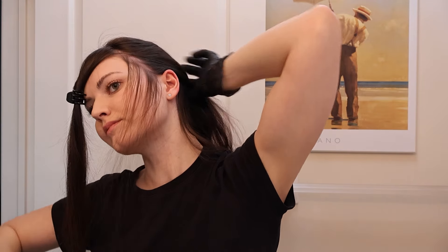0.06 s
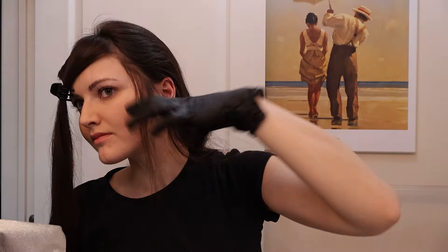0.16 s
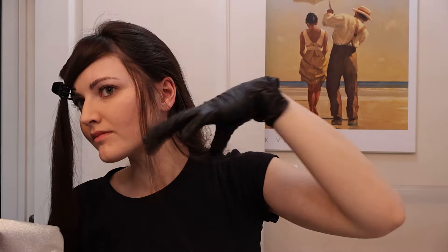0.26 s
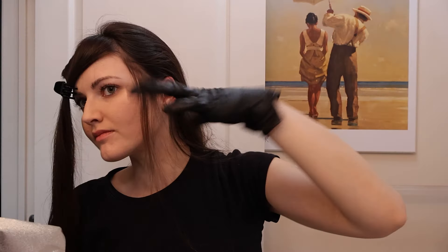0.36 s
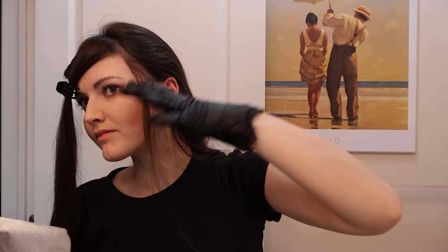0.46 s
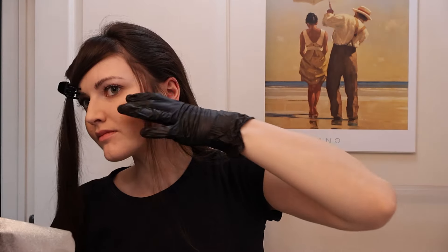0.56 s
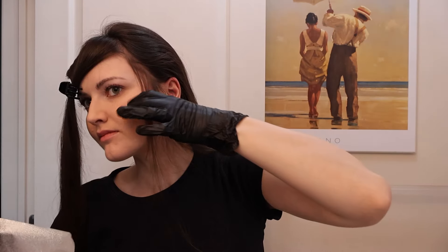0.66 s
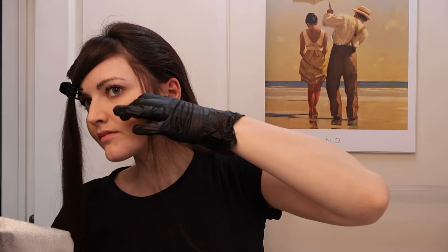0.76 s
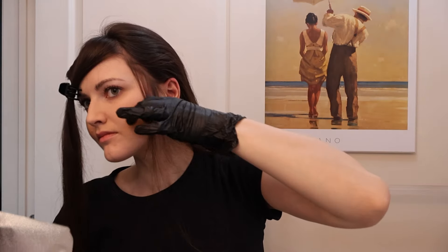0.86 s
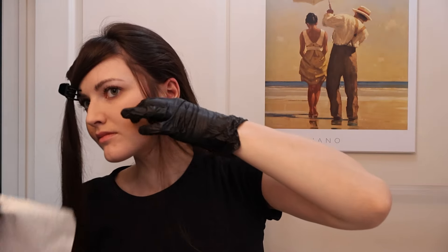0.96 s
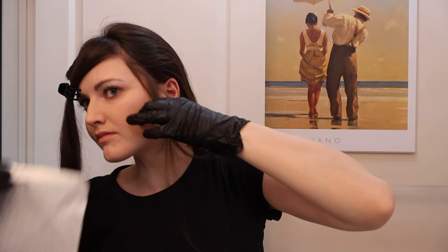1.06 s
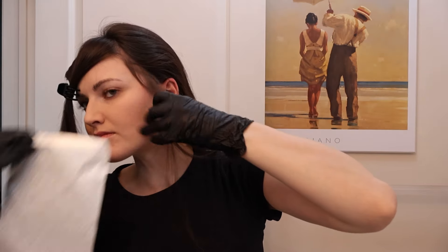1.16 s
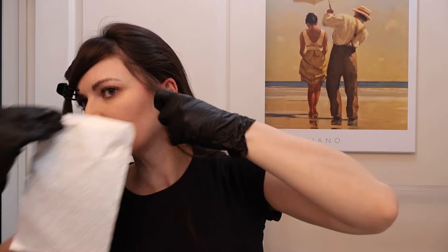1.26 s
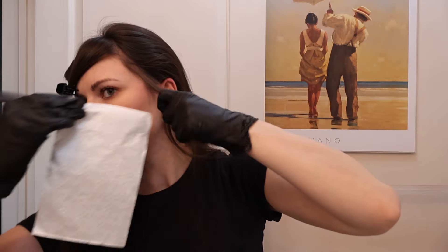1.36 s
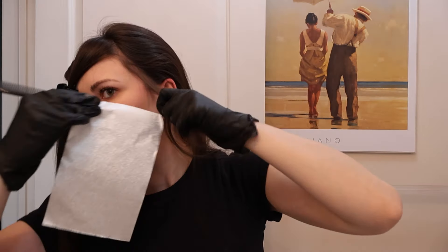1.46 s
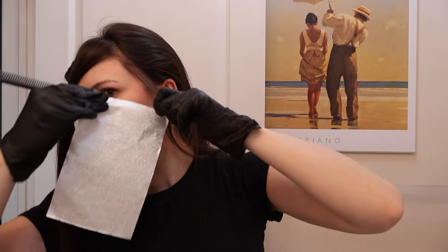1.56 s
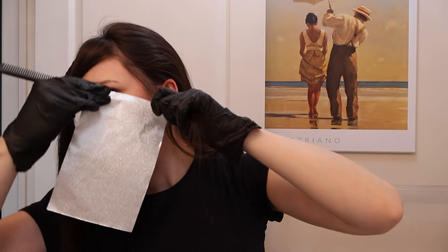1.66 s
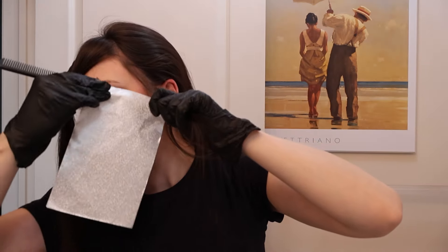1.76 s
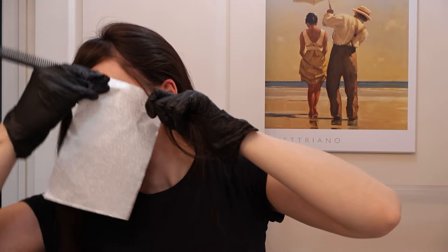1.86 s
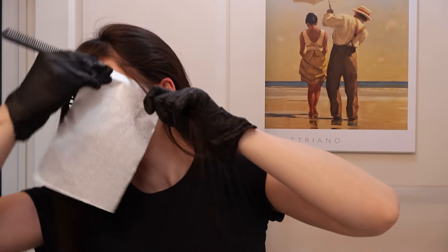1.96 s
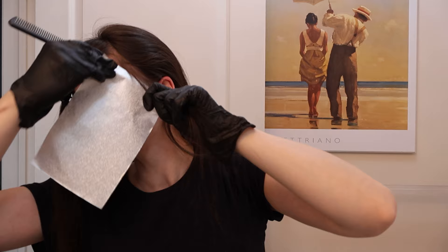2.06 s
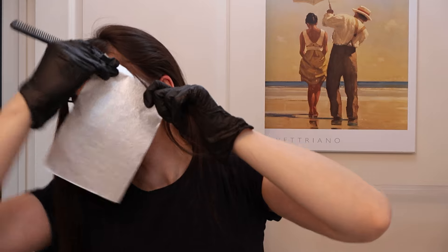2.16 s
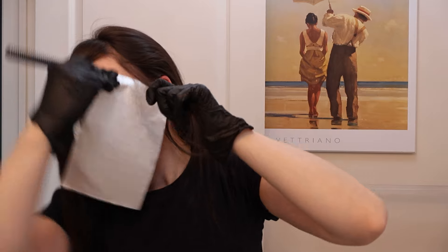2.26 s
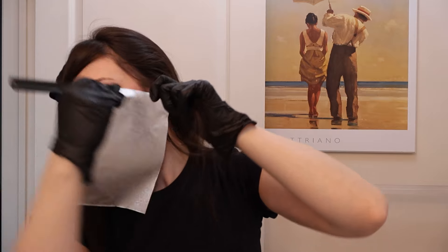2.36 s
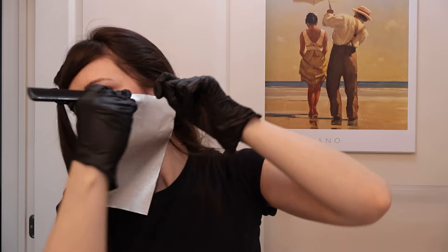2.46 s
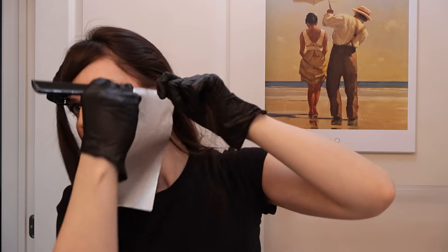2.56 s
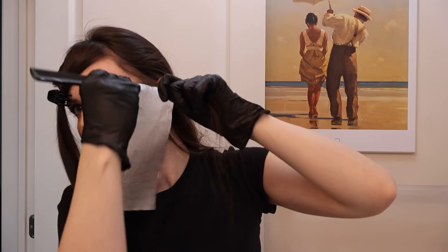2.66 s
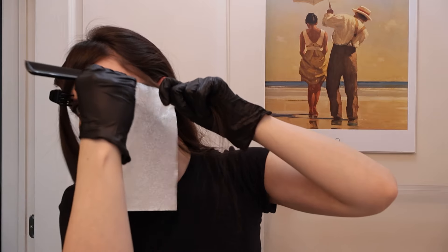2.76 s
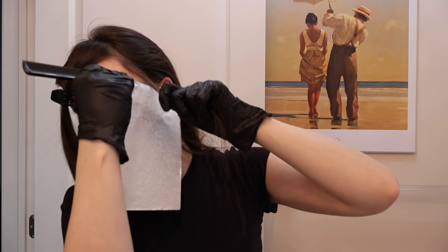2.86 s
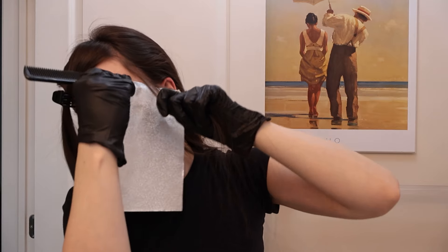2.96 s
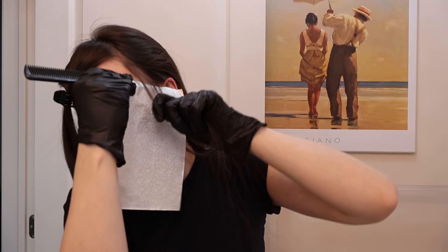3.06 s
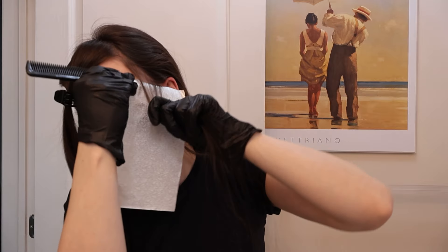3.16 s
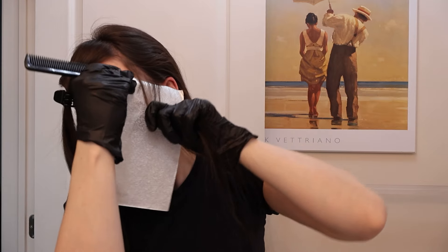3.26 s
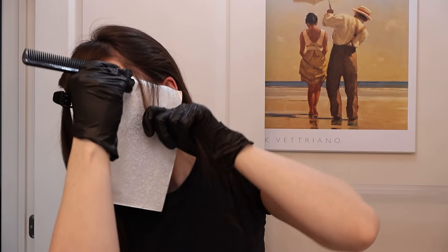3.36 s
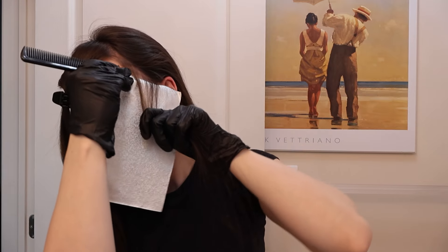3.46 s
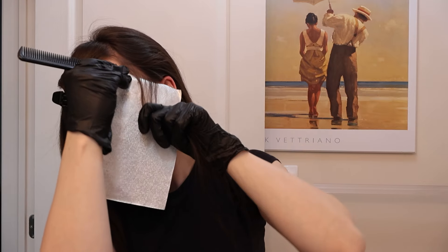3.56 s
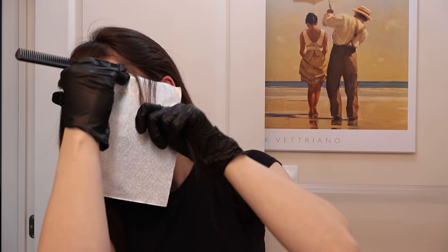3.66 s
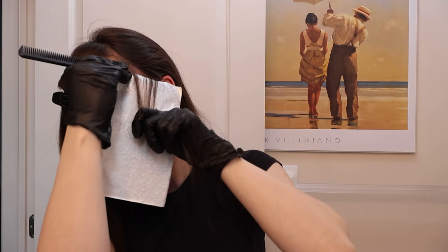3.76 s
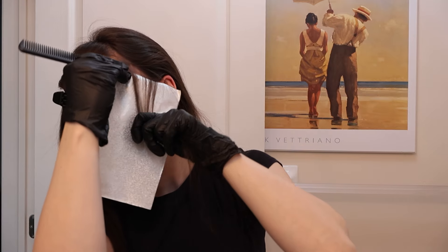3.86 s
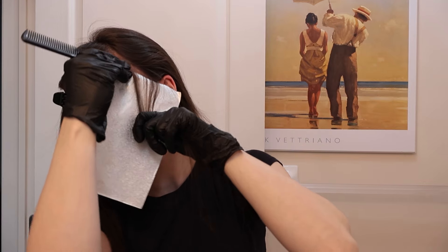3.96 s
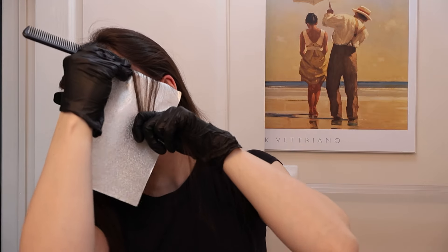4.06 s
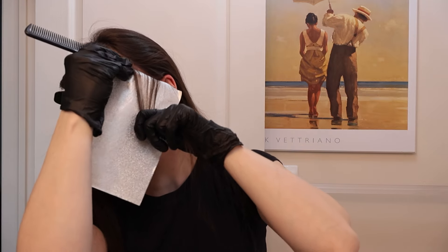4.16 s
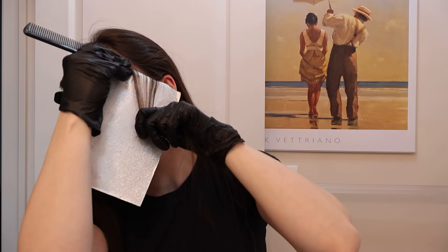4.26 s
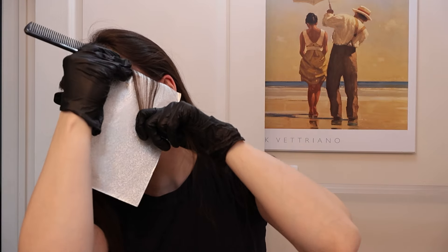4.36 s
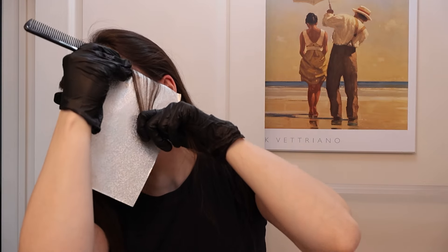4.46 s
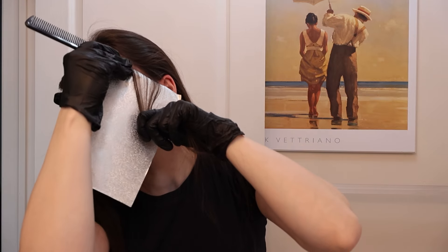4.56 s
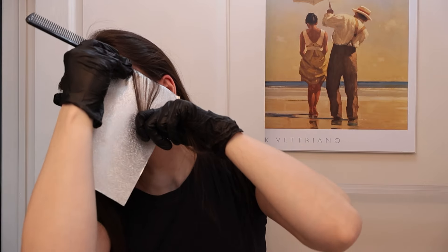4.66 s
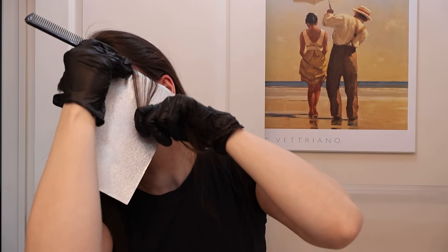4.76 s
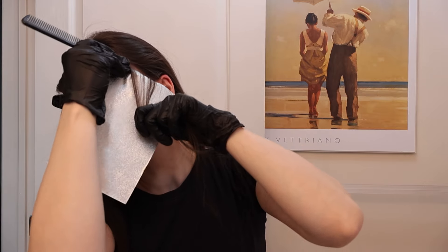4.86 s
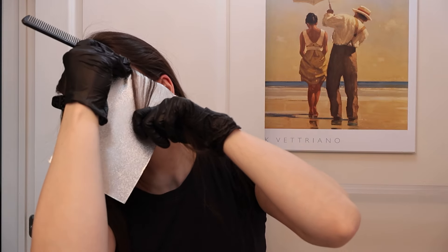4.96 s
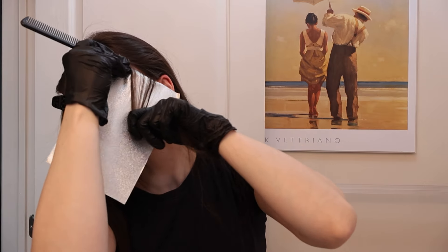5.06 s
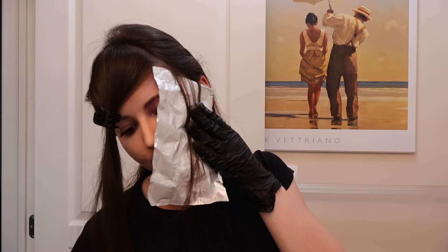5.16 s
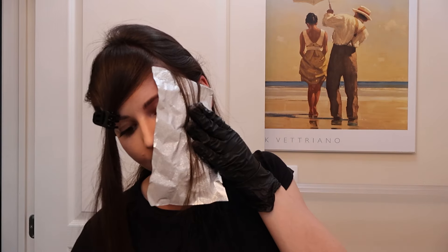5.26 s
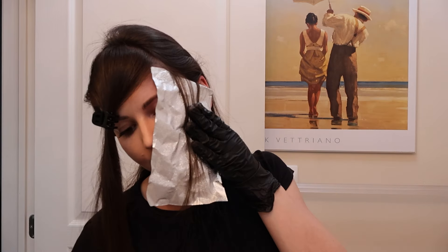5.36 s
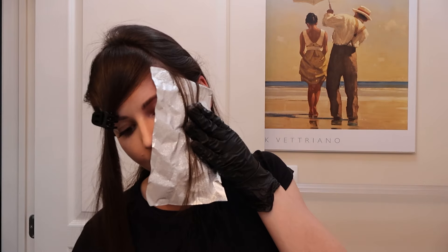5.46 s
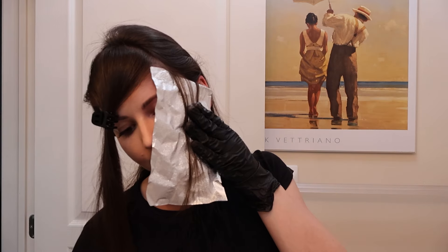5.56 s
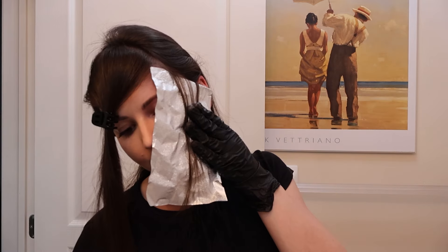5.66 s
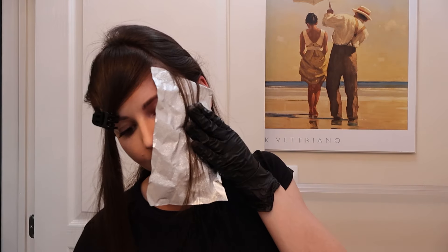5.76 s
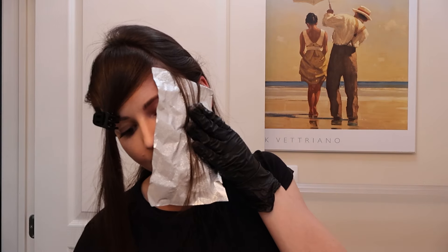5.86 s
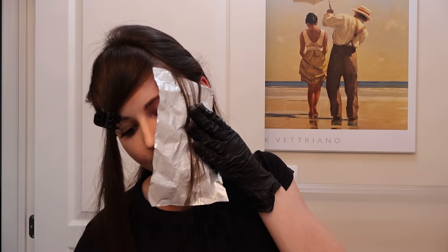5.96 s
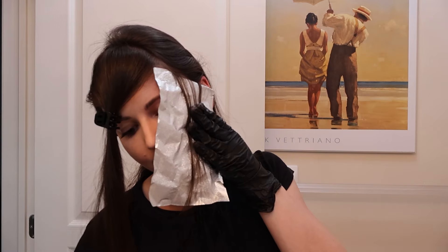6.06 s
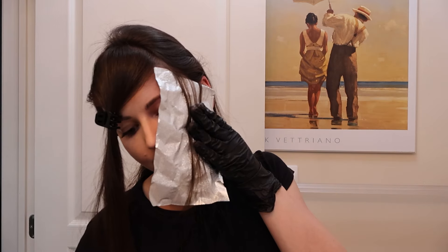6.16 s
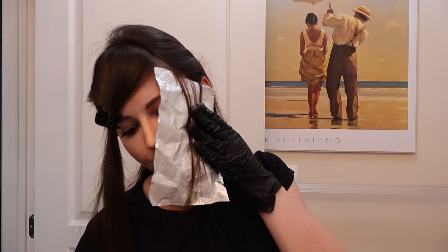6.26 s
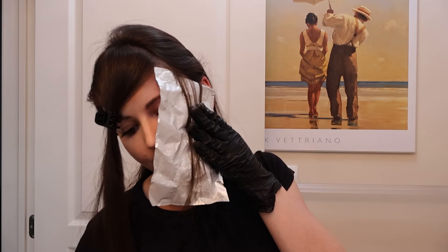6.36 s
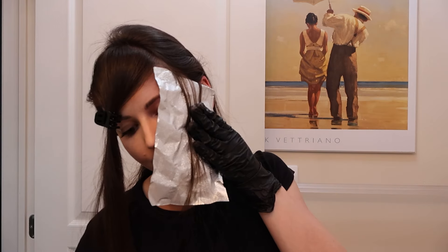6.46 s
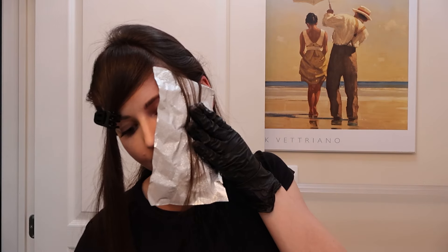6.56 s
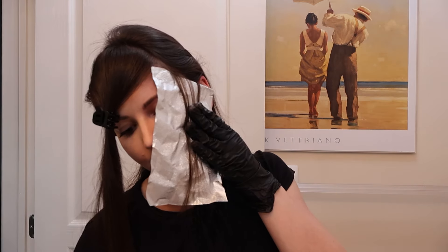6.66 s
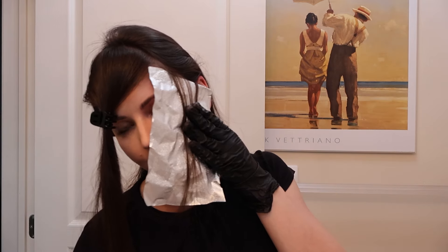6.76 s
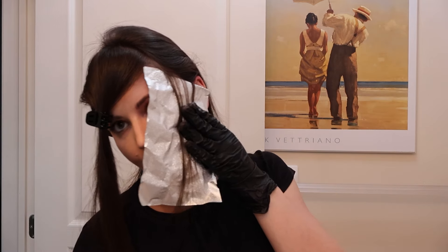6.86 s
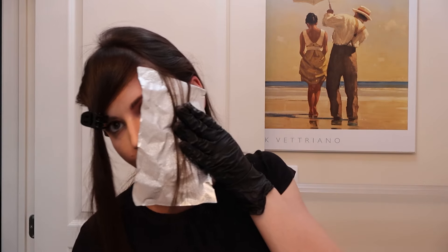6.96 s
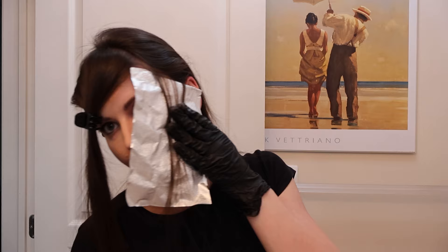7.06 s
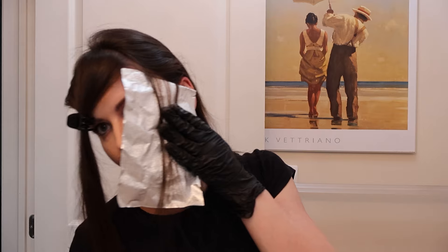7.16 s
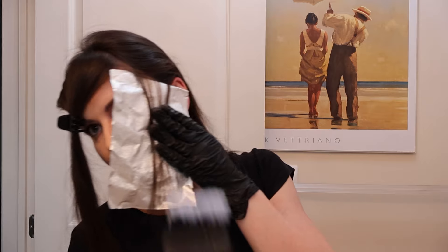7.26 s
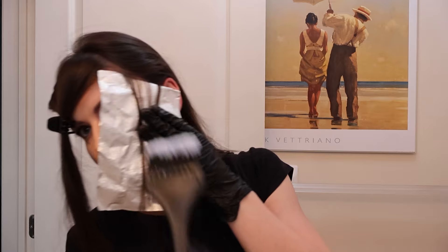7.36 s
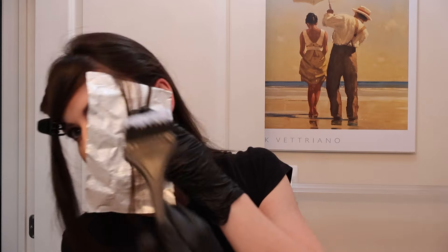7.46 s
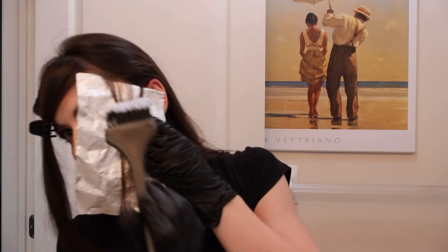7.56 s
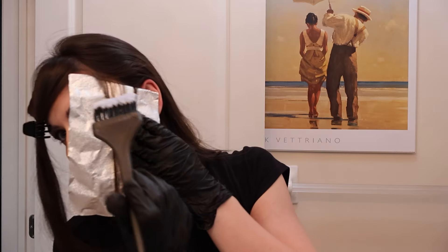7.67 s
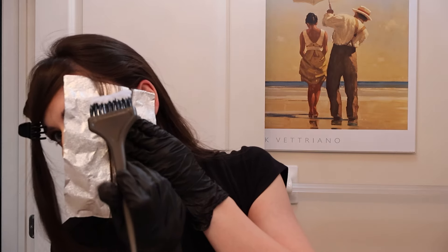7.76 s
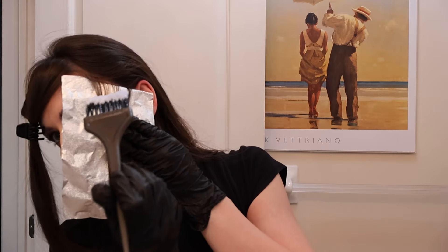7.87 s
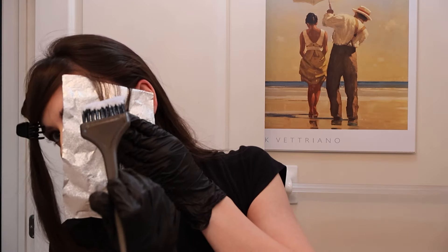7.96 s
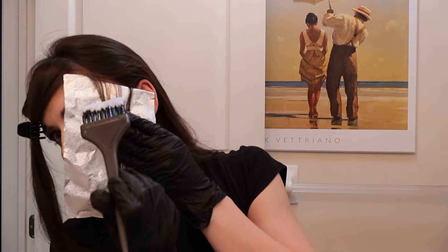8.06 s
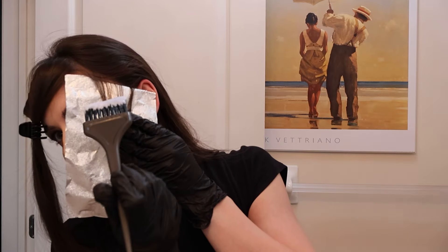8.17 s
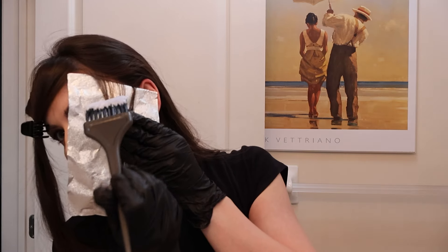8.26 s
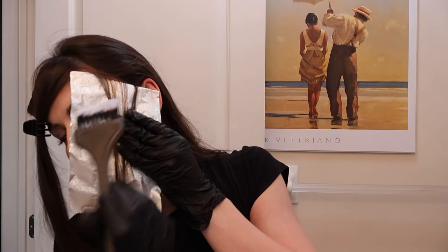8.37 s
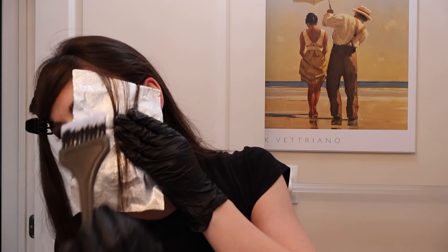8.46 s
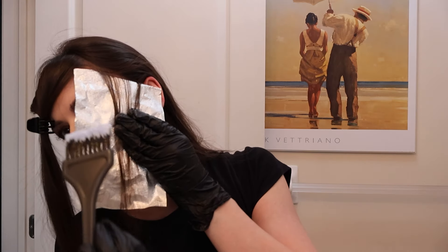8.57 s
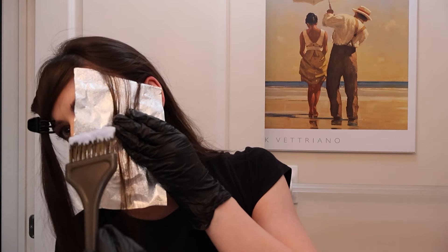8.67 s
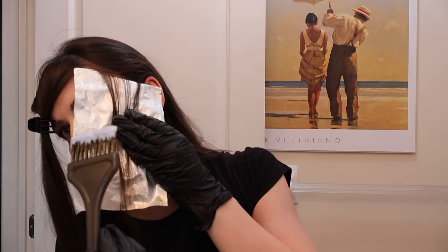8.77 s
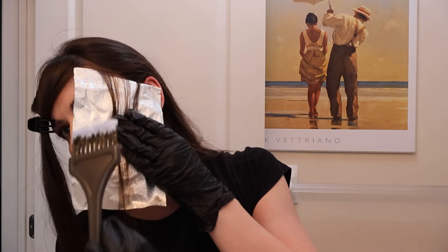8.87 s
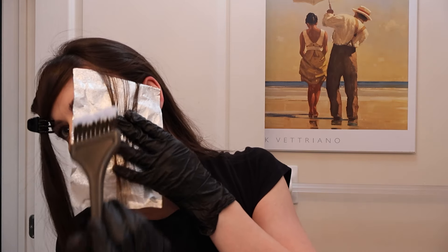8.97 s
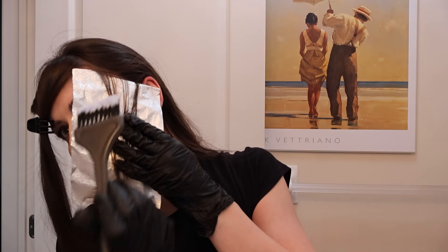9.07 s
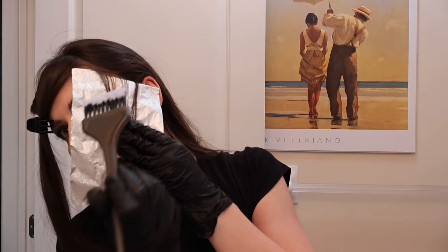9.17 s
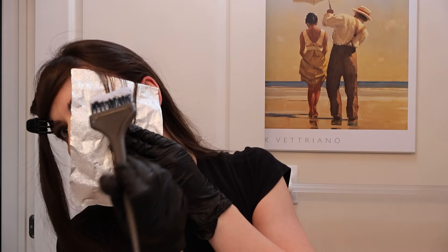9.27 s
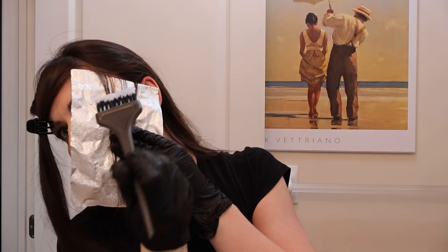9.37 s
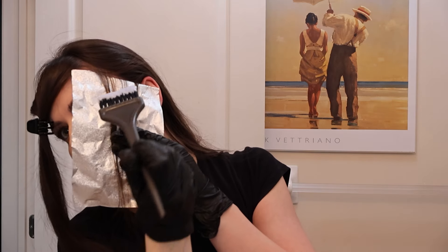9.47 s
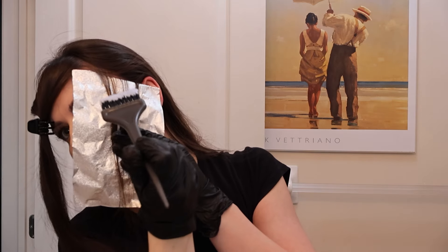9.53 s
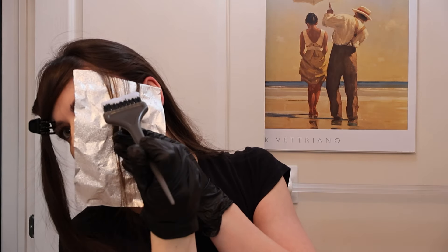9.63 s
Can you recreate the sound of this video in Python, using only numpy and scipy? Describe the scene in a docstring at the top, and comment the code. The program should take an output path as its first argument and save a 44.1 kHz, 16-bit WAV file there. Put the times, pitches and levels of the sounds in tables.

```python
"""Foil and tint brush in a small bathroom

Gloved hands slide a sheet of aluminium foil under a strand of hair, then dab it with a tint brush. Sliding and
bending are swarms of tiny random clicks; buckling pops and bristle ticks are dying bursts. Filters give each
contact its colour, and the hard walls answer with noise echoes and lingering modes. A nearly mono microphone
adds a presence peak over faint hiss and a low hum."""
import sys
import numpy as np
from scipy import signal
from scipy.fft import rfft, irfft
from scipy.io import wavfile

SR = 44100
rng = np.random.default_rng(int(sys.argv[2]) if len(sys.argv) > 2 else 0)


def dump_mix(stems):
    """Bounce the given channels to the path in sys.argv[1] as a 16-bit WAV at rate SR."""
    frames = np.atleast_2d(stems).T  # one column per channel
    limited = np.clip(frames, -1, 1)  # hard clip at full scale
    pcm = np.round(limited * 32767).astype(np.int16)
    wavfile.write(sys.argv[1], SR, pcm)


N = 427769


def undb(db):
    """Decibels to amplitude gain."""
    return 10 ** (np.asarray(db) / 20)


def db_at(points, hz):
    """Read a spectrum of (hz, db) points, joined by straight lines over log frequency."""
    point_hz, point_db = np.transpose(points)
    return np.interp(np.log(hz + 1), np.log(point_hz), point_db)


def colour(x, points, body_db=0, treble_db=0, ring_hz=1000, ring_db=0, size=1024):
    """Causal filter with the given spectrum; body (the sheet flexing), treble and one ring reshape it."""
    hz = np.arange(size // 2 + 1) * SR / size
    tilt = [(250, 0), (700, body_db), (1300, body_db), (2200, 0), (3500, 0), (8000, treble_db)]
    ring = ring_db / (1 + ((hz / ring_hz - 1) / .1) ** 2)
    gain = undb(db_at(points, hz) + db_at(tilt, hz) + ring)
    # folding the cepstrum gives minimum phase, so clicks keep a sharp onset
    cepstrum = irfft(np.log(gain))
    cepstrum[1:size // 2] *= 2
    cepstrum[size // 2 + 1:] = 0
    response = irfft(np.exp(rfft(cepstrum)))
    return signal.fftconvolve(x, response)


def add(track, s, sound):
    """Mix a sound into the track from time s on, trimmed to the track."""
    start = int(round(s * SR))
    sound = sound[max(-start, 0):max(N - start, 0)]
    start = max(start, 0)
    track[start:start + len(sound)] += sound


def background():
    """Steady coloured noise, mostly alike left and right, with a faint sine for a low hum."""
    # room air and microphone hiss: hz, level_db
    hiss_colour = [(20, -49.5), (60, -49), (100, -46.5), (180, -47.5), (300, -47), (600, -50.5),
                   (1200, -53.5), (2000, -55.5), (3000, -56.5), (8000, -58.5), (15500, -61.5)]
    # share of the hiss that differs between left and right: hz, level_db
    hiss_side = [(60, -7), (110, -8.5), (300, -14.5), (1300, -17), (4400, -15.5), (15000, -11)]
    hum_hz, hum_rms_db = 58.4, -76

    mid = colour(rng.standard_normal(N), hiss_colour)[:N]
    side = colour(rng.standard_normal(N), hiss_colour)[:N]
    side = colour(side, hiss_side)[:N]
    hum = undb(hum_rms_db) * np.sqrt(2) * np.sin(2 * np.pi * hum_hz * np.arange(N) / SR)
    return mid + hum + side * np.array([[1], [-1]])


def echoes(t, t60_s):
    """Envelope, of unit energy, of dense reflections that build up and die away."""
    build_up_s = 0.0017
    envelope = undb(-60 * t / t60_s) * (1 - np.exp(-t / build_up_s))
    return envelope / np.linalg.norm(envelope)


def bathroom(x, size=2048):
    """Direct sound, near surfaces, far walls and modes; the echo pattern shifts as the hands move."""
    # narrow resonances that linger in the room: hz, level_db, t60_s
    room_modes = [(696, -56, .4), (1367, -60, 0.41), (2159, -64, 0.28), (2430, -62, 0.27),
                  (2940, -55, 0.33), (4800, -57, .25), (8835, -63, 0.18)]
    near_t60_s, near_wet_db = 0.1, -1.5  # echo levels are relative to the direct sound
    far_t60_s, far_wet_db = 0.38, -5

    t = np.arange(SR // 3) / SR
    modes = sum(undb(db - 60 * t / t60_s) * np.cos(2 * np.pi * hz * t) for hz, db, t60_s in room_modes)
    near = undb(near_wet_db) * echoes(t, near_t60_s)
    far = undb(far_wet_db) * echoes(t, far_t60_s)
    tail = np.hypot(near, far)

    out = np.zeros(N)
    for start in range(0, len(x), size):
        # every block of sound meets a fresh pattern of reflections
        response = modes + tail * rng.standard_normal(len(t))
        response[0] += 1  # direct sound
        response /= np.linalg.norm(response)
        add(out, start / SR, signal.fftconvolve(x[start:start + size], response))
    return out[:len(x)]


def creases(envelope, per_s, spread_db):
    """Random tiny clicks of uneven size that together carry the energy of the envelope."""
    draws = np.random.default_rng(rng.integers(2 ** 31)).standard_normal((len(envelope), 3))
    chance, size, push = draws.T
    # each sample has the same small chance of a crease giving way
    fires = np.exp(-(chance ** 2 + push ** 2) / 2) < per_s / SR
    uneven = undb(spread_db * np.clip(size, -2, 2))
    clicks = fires * np.sign(push) * uneven * envelope
    return clicks * np.sqrt(np.sum(envelope ** 2) / (np.sum(clicks ** 2) + 1e-18))


def rubs(table, spectrum, per_s, spread_db):
    """Each short movement swells and fades as a swarm of creases."""
    out = np.zeros(N)
    for s, half_s, db, body_db, treble_db in table:
        t = np.arange(-5 * half_s, 5 * half_s, 1 / SR)
        swarm = creases(1 / np.cosh(t / half_s), per_s, spread_db)
        add(out, s + t[0], undb(db) * colour(swarm, spectrum, body_db, treble_db))
    return out


def swishes(table, body_db, treble_db):
    """Colour each movement by its pace: a quick swish is bright, a slow one dull."""
    middle_half_s, middle_treble_db, loss_db_per_doubling = 0.014, 3.5, 2
    coloured = []
    for s, half_s, db in table:
        pace_db = middle_treble_db - loss_db_per_doubling * np.log2(half_s / middle_half_s)
        coloured.append((s, half_s, db, body_db, treble_db + pace_db))
    return coloured


def facets(table, middle_hz, body_db_per_oct, treble_db_per_oct):
    """Colour each snap by its facet: a small one rings higher, with more treble and less body."""
    coloured = []
    for s, decay_ms, db, hz in table:
        octaves = np.log2(hz / middle_hz)
        coloured.append((s, decay_ms, db, -body_db_per_oct * octaves, treble_db_per_oct * octaves, hz))
    return coloured


def snaps(table, spectrum, per_s, spread_db, first_share, ring_db):
    """One fold gives way at once and sets off a dying avalanche of smaller ones; the facet rings."""
    out = np.zeros(N)
    share = np.clip(first_share, 0, 1)  # of the energy, in the first click
    for s, decay_ms, db, body_db, treble_db, ring_hz in table:
        envelope = np.exp(-np.arange(SR // 12) / SR * 1000 / decay_ms)
        burst = np.sqrt(1 - share) * creases(envelope, per_s, spread_db)
        burst[0] += np.sqrt(share * np.sum(envelope ** 2))
        add(out, s, undb(db) * colour(burst, spectrum, body_db, treble_db, ring_hz, ring_db))
    return out


def sleeve():
    """Shirt cloth shifting as an arm moves: soft, low swarms of clicks."""
    # movements of the cloth: centre_s, half_length_s, level_db, body_db, treble_db
    sleeve_moves = [(0.46, .008, -37, 7.5, 4), (2.2, 0.18, -42.5, 12.5, 0), (4.85, 0.27, -40, 0.5, 2),
                    (7.55, .18, -38.5, 0.5, -2)]
    # what cloth radiates: hz, level_db
    sleeve_colour = [(100, -26), (220, -9.5), (300, -3), (420, -2.5), (600, -14.5), (1500, -14.5),
                     (8000, -34.5)]
    return rubs(sleeve_moves, sleeve_colour, per_s=5900, spread_db=4.5)


def hair():
    """A glove smoothing the strand gives only a thin, high hiss of fine clicks."""
    # strokes of the glove: centre_s, half_length_s, level_db
    hair_swishes = [(0.15, 0.33, -57.5), (0.741, 0.021, -52.5), (0.928, 0.016, -47.5), (0.975, 0.037, -54),
                    (1.089, .016, -52.5)]
    # what a glove on hair radiates: hz, level_db
    hair_colour = [(100, -20), (1000, -5), (3200, -2), (5300, 6.5), (9000, 3), (15800, -4.5)]
    moves = swishes(hair_swishes, body_db=-1, treble_db=1)
    return rubs(moves, hair_colour, per_s=5000, spread_db=7.0)


def flicks(strokes, count=2):
    """Single bristles flick free: high ticks at random moments around each stroke's centre."""
    above_stroke_db, ring_hz = 3, 12800
    moments = rng.standard_normal((len(strokes), count))
    ticks = []
    for (s, half_s, db), row in zip(strokes, moments):
        for when in row:
            ticks.append((s + half_s * when, db + above_stroke_db, ring_hz))
    return ticks


def brush():
    """Bristles catch less often than sliding foil, so they sound grainy; pressing sounds hollow."""
    # bristles dragging over the foil: centre_s, half_length_s, level_db (before the mix gain)
    brush_strokes = [(7.18, 0.041, -49), (7.5, .12, -53.5), (8.0, 0.17, -55), (8.344, 0.02, -41.5),
                     (8.45, 0.027, -45.5), (8.508, .018, -38), (8.544, 0.0043, -30.5),
                     (8.572, 0.032, -41.5), (8.675, 0.02, -40), (8.901, 0.021, -42), (8.96, .04, -47.5),
                     (9.03, 0.0087, -42), (9.148, 0.038, -42.5), (9.255, 0.026, -49), (9.297, 0.011, -38.5),
                     (9.355, 0.032, -46)]
    # the brush pressing the sheet against the palm: centre_s, half_length_s, level_db (before the mix gain)
    brush_presses = [(8.481, .055, -44.5), (8.68, 0.028, -51), (8.825, .018, -50), (9.162, 0.041, -52)]
    # sticky bristles landing or letting go: start_s, level_db (before the mix gain), facet_ring_hz
    brush_ticks = [(7.184, -36.5, 12400), (7.3158, -36.5, 11400), (7.5985, -36.5, 3280), (7.646, -37, 2400),
                   (7.8658, -30, 5100), (7.8856, -22, 3930), (7.9245, -24.5, 2230), (7.978, -29.5, 2350),
                   (8.204, -32.5, 2460), (8.483, -28, 900), (8.5232, -18, 7460), (8.6593, -30, 12500),
                   (8.81, -43, 680), (9.05, -28, 12900), (9.1165, -26.5, 1840), (9.1743, -20.5, 1610),
                   (9.235, -24, 2570), (9.245, -21, 4870), (9.3226, -26, 11900), (9.4529, -25, 740),
                   (9.561, -24, 2040), (9.5723, -19, 1710), (9.5944, -24.5, 5200)]
    # what strokes and presses radiate: hz, level_db
    stroke_colour = [(100, -11), (300, -4), (500, -0.5), (700, 7.5), (900, 7), (1200, -0.5), (2000, 1),
                     (2400, 1), (5000, -1), (13000, -11), (15800, -12)]
    # what ticks radiate: hz, level_db
    tick_colour = [(100, -25), (300, -13), (650, -1.5), (1200, -2), (2000, -1), (4500, 1), (8900, -4),
                   (13300, -6.5), (15800, -5)]
    press_body_db, press_treble_db, tick_decay_ms = 7, -9, 1.63

    moves = swishes(brush_strokes, body_db=-3.0, treble_db=5)
    strokes = rubs(moves, stroke_colour, per_s=2000, spread_db=2.5)

    moves = [(s, half_s, db, press_body_db, press_treble_db) for s, half_s, db in brush_presses]
    presses = rubs(moves, stroke_colour, per_s=2000, spread_db=4.0)

    touches = [(s, tick_decay_ms, db, hz) for s, db, hz in brush_ticks + flicks(brush_strokes)]
    touches = facets(touches, middle_hz=5000, body_db_per_oct=1.7, treble_db_per_oct=7.0)
    # many bristles touch together, so a tick is a tight, even cluster
    ticks = snaps(touches, tick_colour, per_s=15000, spread_db=3.0, first_share=.2, ring_db=5.0)
    return undb(-1.6) * (strokes + presses) + undb(0.06) * ticks


def drags(table, spectrum, per_s, spread_db):
    """The sheet catches and slips: a long swarm of creases as loud as its fluttering friction."""
    flutter_per_s, flutter_db = 110, 3
    out = np.zeros(N)
    for curve, body_db, treble_db in table:
        s, db = np.transpose(curve)
        t = np.arange(s[0], s[-1], 1 / SR)
        grip = rng.standard_normal(size=512)
        flutter = np.interp((t - s[0]) * flutter_per_s, np.arange(len(grip)), grip)
        envelope = undb(np.interp(t, s, db) + flutter_db * flutter)
        swarm = creases(envelope, per_s, spread_db)
        add(out, s[0], colour(swarm, spectrum, body_db, treble_db))
    return out


def bends(table):
    """A gentle bend is mostly body; in a hard one more creases join in and cover it."""
    middle_db, middle_body_db, body_loss_per_db, treble_db = -35, 6, 0.71, -31
    coloured = []
    for s, half_s, db in table:
        body_db = middle_body_db - body_loss_per_db * (db - middle_db)
        coloured.append((s, half_s, db, body_db, treble_db))
    return coloured


def foil():
    """The sheet hisses as it slides, rustles low as it bends and pops as it buckles."""
    # friction while the sheet is worked under the strand: time_s, level_db (before the mix gain)
    first_pull = [(1.92, -48), (1.975, -34), (2.01, -38.5), (2.11, -36.5), (2.18, -42), (2.22, -44),
                  (2.28, -47), (2.36, -43), (2.39, -45)]
    second_pull = [(2.39, -56), (2.5, -43), (2.6, -50), (2.67, -37.5), (2.82, -42.5), (2.93, -64),
                   (3.07, -39.5), (3.17, -47.5), (3.3, -52.1)]
    settling = [(3.3, -52.1), (3.38, -51), (3.62, -55.5), (3.72, -47.5), (3.79, -44), (3.87, -54),
                (4.06, -48), (4.15, -46.5), (4.2, -60)]
    smoothing = [(4.2, -67), (4.3, -56), (4.42, -56), (4.56, -49.5), (4.66, -55.5), (4.8, -51.5),
                 (4.93, -49.5), (5.15, -55.5)]
    # long movements: friction curve, body_db, treble_db
    long_drags = [(first_pull, -5, -1), (second_pull, -1, -2), (settling, 1, -1.3), (smoothing, 2.4, 0)]
    # short swishes on hair and gloves: centre_s, half_length_s, level_db (before the mix gain)
    foil_swishes = [(1.292, .026, -42.5), (1.438, 0.073, -48), (1.563, 0.0047, -30), (1.583, 0.0038, -32),
                    (1.854, 0.008, -36.5), (1.975, .014, -38.5), (2.178, .012, -45), (2.773, 0.018, -30.5),
                    (2.866, .016, -31.5), (2.977, 0.015, -34.5), (3.215, 0.014, -39),
                    (3.357, 0.0062, -44.5), (3.745, 0.017, -48), (4.262, 0.022, -44.5)]
    # the whole sheet bending: centre_s, half_length_s, level_db (before the mix gain)
    foil_bends = [(1.632, .024, -35), (2.37, .014, -39.5), (2.449, .022, -25.5), (2.497, .021, -27),
                  (2.69, 0.035, -55), (2.835, 0.032, -28.5), (2.921, 0.023, -23.5), (3.526, 0.013, -40.5),
                  (3.888, .015, -41), (4.325, .016, -48), (4.4, .025, -53), (4.62, .011, -54),
                  (4.688, .016, -42), (4.864, .025, -64), (5.123, 0.018, -43.5)]
    # the sheet buckling: start_s, decay_ms, level_db (before the mix gain), facet_ring_hz
    foil_pops = [(1.1985, 3.9, -48, 6850), (1.4165, 2.1, -39, 6030), (1.5525, 30, -31, 3280),
                 (1.5795, 7.2, -16, 1410), (1.584, 8, -26, 700), (1.591, 3.2, -16.5, 1810),
                 (1.8555, 2.0, -18.5, 2510), (2.0335, 3.6, -20.5, 2310), (2.293, 8.8, -31, 5400),
                 (2.4025, 12, -18.5, 2700), (2.46, 16.6, -20, 3100), (2.5145, 19, -25, 2400),
                 (2.572, 3.1, -17, 2090), (2.657, 5.2, -18, 2300), (3.108, 1.6, -28, 6100),
                 (3.4245, 15.3, -25, 2370), (3.987, 11, -24, 3970), (4.003, 1.8, -19, 5330),
                 (4.248, 20, -36.5, 3240), (4.4835, 4.2, -22, 3300), (4.5225, 6.3, -32.5, 3620),
                 (4.6745, 11, -34, 1070), (4.775, 0.59, -39, 9900), (5.0385, 13, -27, 3060),
                 (5.107, 2.1, -20, 2700), (5.12, 4, -24, 3340), (5.5475, .7, -53.5, 12530),
                 (5.8885, 3.3, -41, 3980), (6.882, 6.7, -33, 3320), (6.886, 6.7, -41.5, 7000)]
    # what sliding and bending radiate: hz, level_db
    slide_colour = [(100, -29), (250, -32.5), (420, -6), (1000, -5), (1300, -2.5), (1700, -3), (2400, 0),
                    (3600, -2), (5000, 3), (7500, 0.5), (11000, -2), (15800, -5)]
    # what pops radiate: hz, level_db
    pop_colour = [(100, -17), (250, -9), (450, -14.5), (700, -6), (1000, -8.5), (1350, -1), (1700, -3),
                  (2400, 3.5), (3300, -0.5), (5000, -0.5), (8500, -10.5), (15800, -16.5)]

    pulls = drags(long_drags, slide_colour, per_s=7000, spread_db=3.0)
    # among the tiny creases a larger one gives way now and then
    crackle = drags(long_drags, slide_colour, per_s=300, spread_db=4.0)

    moves = swishes(foil_swishes, body_db=1, treble_db=-0.5)
    slides = rubs(moves, slide_colour, per_s=7000, spread_db=6.5)
    flexing = rubs(bends(foil_bends), slide_colour, per_s=4000, spread_db=6.0)

    folds = facets(foil_pops, middle_hz=3180, body_db_per_oct=5, treble_db_per_oct=15.5)
    pops = snaps(folds, pop_colour, per_s=7000, spread_db=4.0, first_share=0.02, ring_db=3.0)

    sliding = undb(2.0) * pulls + undb(-6.0) * crackle + undb(-0.15) * slides
    return sliding + undb(-1.5) * flexing + undb(-0.83) * pops


def scene():
    """Placing the foil, then brushing; the first part breaks off at a cut, echo and all."""
    # the microphone's treble, with its presence peak: hz, level_db
    mic_colour = [(7800, 0), (8900, 4.5), (10000, -2.5), (11200, -2.5), (13000, 1.5), (15800, -5.5)]
    cut_s = 5.153

    hands = hair() + foil() + brush() + sleeve()
    hands = colour(hands, mic_colour)[:N]
    before_cut, after_cut = np.split(hands, [int(cut_s * SR)])
    # each part has its own echoes, so none carry over the cut
    return np.concatenate([bathroom(before_cut), bathroom(after_cut)]) + background()


def record(dry):
    """The recorder cuts the top steeply with an elliptic low-pass."""
    top_hz, ripple_db, stop_db = 15850, .1, 75
    low_pass = signal.ellip(10, ripple_db, stop_db, top_hz, fs=SR, output="sos")
    return signal.sosfilt(low_pass, dry)


dry = scene()
out = record(dry)
dump_mix(out)
```